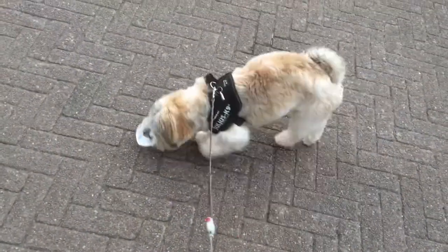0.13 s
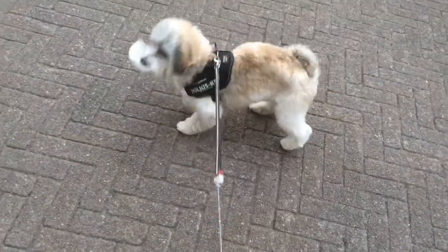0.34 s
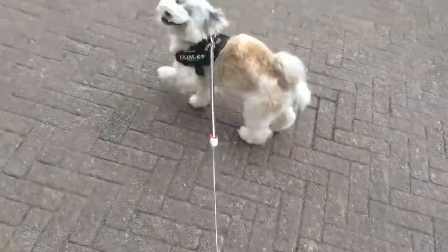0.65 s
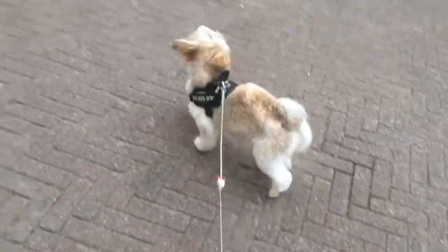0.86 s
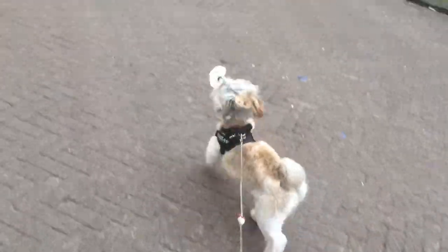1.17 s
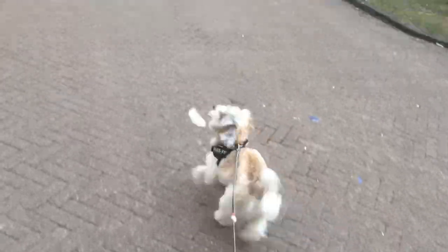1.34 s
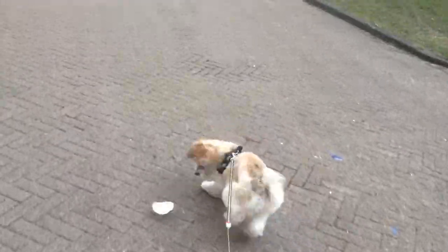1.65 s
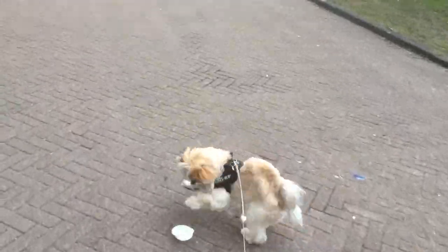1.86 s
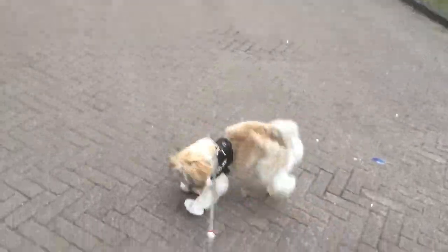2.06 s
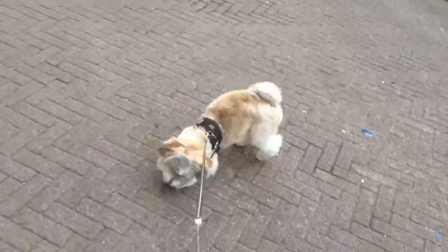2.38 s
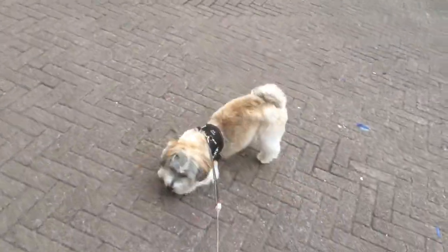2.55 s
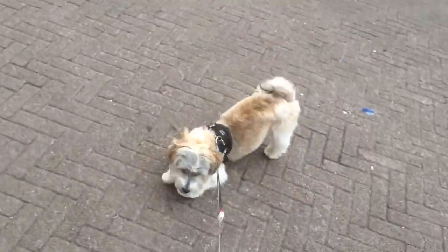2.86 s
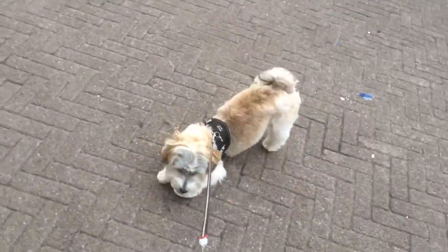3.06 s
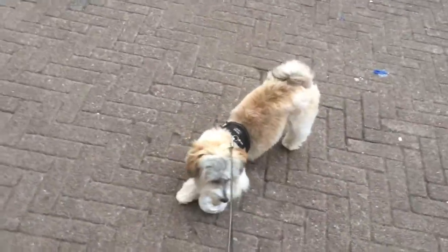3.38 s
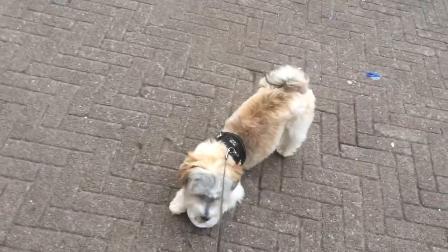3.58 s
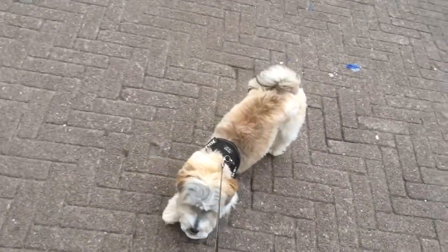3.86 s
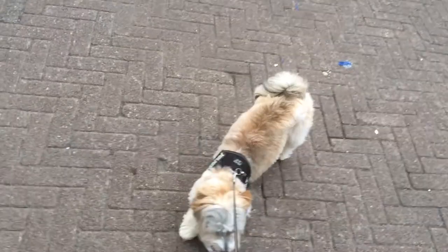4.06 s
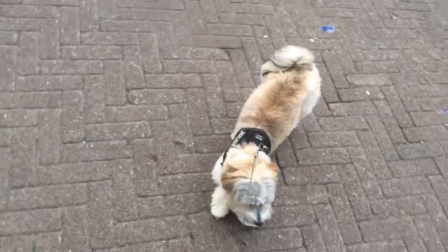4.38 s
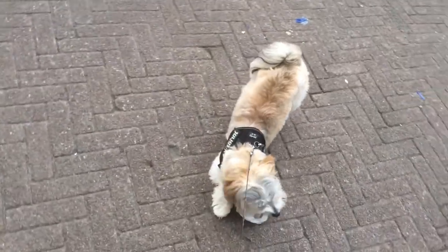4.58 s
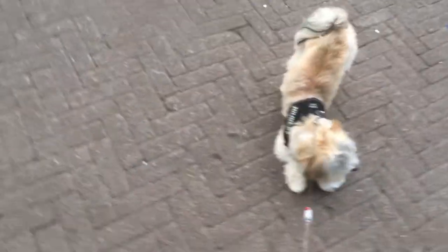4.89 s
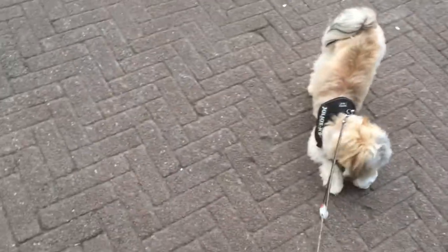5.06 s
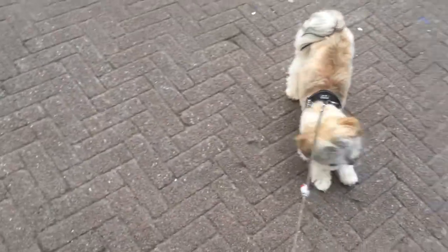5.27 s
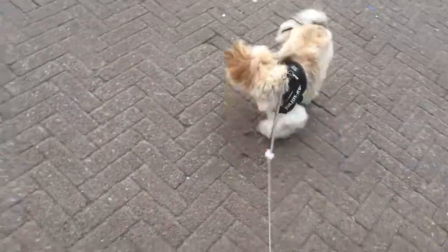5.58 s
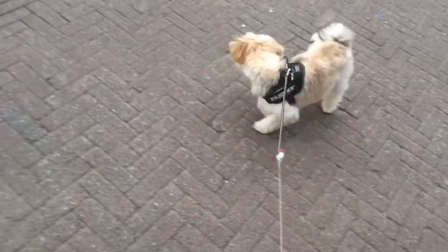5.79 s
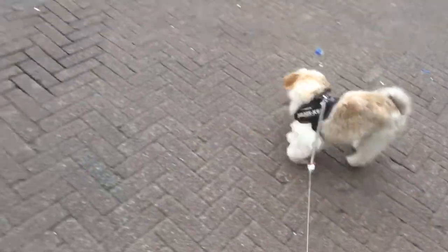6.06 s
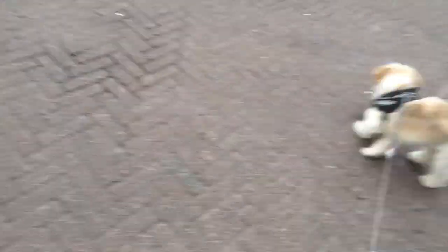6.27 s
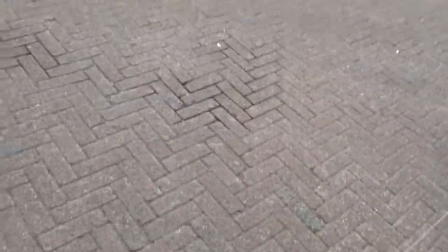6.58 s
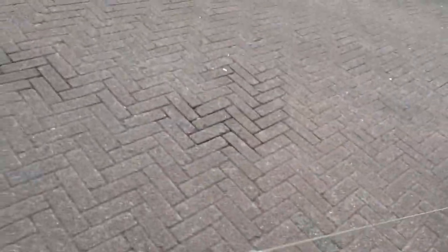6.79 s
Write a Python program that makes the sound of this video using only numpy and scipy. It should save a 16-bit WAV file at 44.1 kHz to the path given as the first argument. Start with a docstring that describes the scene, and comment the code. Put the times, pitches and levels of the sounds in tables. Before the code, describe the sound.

A thin plastic lid clacks and scrapes over brick paving as a small dog paws at it, claws ticking unevenly above faint traffic rumble.

```python
"""A small dog on a reel leash worries a plastic lid on brick paving, close to a hand-held phone.
Throughout, far traffic rumbles in noise bands under two wavering sine hums, and filtered noise hisses in swells.
Claws, lid and leash catch soon click in uneven clusters (noise snaps over plastic modes), with gritty noise scrapes.
A far bird whistles once early on: a breathy gliding sine, up briefly and then down.
Later paws pat (noise puffs over dull damped sines); one low thump, a short tone under an arch, falls near the end."""
import sys
import numpy as np
from scipy import signal
from scipy.io import wavfile
from scipy.ndimage import uniform_filter1d

SR = 44100
rng = np.random.default_rng(int(sys.argv[2]) if len(sys.argv) > 2 else 0)


def transcribe(u):
    """Save the signal u as a 16-bit wav file named by the first command-line argument.

    u: samples, shape (n,) or (channels, n), limited to [-1, 1]; the rate is SR.
    q: integer samples, one column per channel.
    """
    v = np.clip(np.atleast_2d(u).T, -1, 1)
    q = np.round(v * 32767).astype(np.int16)
    wavfile.write(sys.argv[1], SR, q)


N = 305877
TIME = np.arange(N) / SR
HIT_TIME = np.arange(int(.09 * SR)) / SR  # s, span of one contact

# hard clicks: start_s, relative snap_db, snap_centre_hz, ring_peak_db, struck_part_hz
CLICKS = [(.121, -37.5, 7340, -49, 3000), (.1268, -41, 8600, -31, 3060), (0.1371, -29, 7900, -35, 1380),
          (.143, -37, 7600, -32, 2400), (.168, -37, 9000, -37.5, 1300), (0.1765, -33.5, 7900, -29, 2900),
          (0.256, -52, 7150, -39.5, 2510), (0.3358, -43, 7900, -71, 900), (0.43, -46, 8350, -50.5, 1660),
          (.588, -29, 7600, -31.5, 2320), (.6116, -33, 7350, -45, 1200), (0.6202, -24.5, 7500, -23, 3400),
          (0.622, -37, 7500, -31, 1040), (0.635, -38, 7940, -43, 1040), (.6559, -33, 10100, -49, 2080),
          (0.6669, -38, 9000, -59, 890), (.693, -35, 7900, -29.5, 2350), (0.781, -44.5, 8800, -55, 2060),
          (1.0619, -43.5, 9100, -48, 1660), (1.1198, -48, 8600, -63, 1230), (1.211, -32, 8400, -33.5, 1920),
          (1.22, -29, 6270, -30.5, 1900), (1.2324, -30, 6900, -34.5, 1150), (1.2478, -38, 7600, -29, 1970),
          (1.2672, -28, 6660, -27.5, 2240), (1.2782, -33, 7200, -32, 3480), (1.2865, -32, 8300, -27, 2040),
          (1.2937, -36, 9700, -24, 2520), (1.4348, -38.5, 10700, -49, 1200),
          (1.5372, -39.5, 11400, -56, 1170), (1.7207, -12, 6500, -13, 1770), (1.7406, -27, 8200, -17, 2850),
          (1.7415, -16, 7000, -18.5, 2760), (1.791, -41, 11100, -48, 1030),
          (1.8198, -33.5, 7800, -37.5, 4200), (1.8932, -34, 7100, -31.5, 2440),
          (1.9, -34.5, 6500, -34.5, 1570), (1.9302, -39, 7600, -37, 1520), (1.9364, -42, 8800, -36, 2400),
          (1.9631, -45, 6160, -38, 1510), (2.0601, -42, 7000, -33.5, 2390), (2.067, -41, 8000, -34, 2470),
          (2.0864, -46, 7000, -26.5, 2400), (2.0942, -22, 8600, -25, 2470),
          (2.1036, -20.5, 8000, -17.5, 3200), (2.1143, -21.5, 7450, -29, 1800),
          (2.1254, -35, 8000, -40, 1060), (2.2174, -36.5, 5360, -34.5, 2270),
          (2.2734, -18, 9400, -42, 1640), (2.2813, -35, 6500, -26.5, 1930), (2.3164, -31, 7500, -40, 2490),
          (2.327, -24, 7000, -29, 3370), (2.3378, -14, 7050, -20, 1830), (2.3534, -28, 9700, -30, 3640),
          (2.3617, -34, 8800, -34, 1690), (2.3875, -52, 7800, -39, 1340),
          (2.4288, -36.5, 8240, -36.5, 1760), (2.566, -43, 6900, -47, 1490),
          (2.6436, -26.5, 7600, -21.5, 3000), (2.7357, -34, 11400, -48, 1220),
          (2.7523, -15, 11500, -31.5, 3750), (2.759, -24, 8850, -42, 3450), (2.8953, -36, 8000, -45, 3650),
          (2.903, -24, 9900, -26, 3500), (2.926, -40, 7000, -38, 1350), (2.9357, -17, 10700, -30.5, 3550),
          (2.952, -19, 10800, -35, 3500), (3.27, -28.5, 11800, -43, 1080), (3.275, -51, 9100, -37, 890),
          (3.286, -20.5, 11300, -36, 1020), (3.297, -14.5, 9400, -26.5, 1260),
          (3.305, -29, 10100, -34, 3420), (3.312, -37, 8400, -31, 3690), (3.3225, -27, 11000, -27, 1410),
          (3.326, -4.5, 11700, -19.5, 2900), (3.3349, -18, 8100, -15, 2820),
          (3.346, -23.5, 6760, -25.5, 1580), (3.3626, -28, 6650, -34, 1710),
          (3.6828, -42, 7000, -36.5, 2740), (3.6951, -29.5, 7100, -30.5, 1730),
          (3.7001, -40, 8500, -30, 1810), (3.716, -42, 7500, -39, 1810), (3.903, -60, 6950, -35, 1370),
          (4.0535, -45, 7900, -49, 1790), (4.0633, -58, 9000, -41, 975), (4.073, -60, 9000, -47, 1010),
          (4.1158, -50, 7500, -32, 1550), (4.125, -17, 9900, -33.5, 2550), (4.1654, -47, 6500, -48, 1090),
          (4.2, -37, 7700, -37.5, 1510), (4.2135, -18.5, 10000, -31.5, 2300), (4.225, -24, 9700, -35, 4200),
          (4.2354, -27, 9200, -38, 2270), (4.247, -16, 9000, -25.5, 3820), (4.5299, -23, 7500, -30, 2340),
          (4.6165, -44, 8100, -47, 1560), (4.759, -8.5, 10200, -12, 3260), (4.781, -52, 7200, -35.5, 1810),
          (4.898, -42.5, 8700, -60, 1220), (4.97, -32.5, 8500, -40.5, 790), (4.9913, -55, 8100, -45, 1240),
          (5.0494, -20, 7550, -27, 1960), (5.0674, -17, 8700, -21.5, 2700), (5.0825, -34, 7800, -43, 2090),
          (5.1116, -39.5, 9000, -47, 3200), (5.187, -34, 10600, -63, 930), (5.252, -15, 8400, -26, 2550),
          (5.272, -20.5, 9000, -31, 2210), (5.2774, -28, 7440, -29, 3600), (5.29, -39, 8500, -26.5, 2360),
          (5.2953, -24.5, 9400, -37, 790), (5.3027, -30, 8900, -33.5, 806),
          (5.3228, -24.5, 8600, -46, 1570), (5.508, -46, 9800, -45, 1270), (5.5163, -37, 9200, -54, 1180),
          (5.529, -45, 10500, -60, 1500), (5.6203, -39, 9600, -57, 1800), (5.6316, -34, 11400, -52, 1140),
          (5.825, -41, 10200, -60, 1110), (6.4041, -8, 8200, -2.5, 1785), (6.4145, -30, 7200, -39, 1680),
          (6.429, -35, 7800, -51, 1840), (6.435, -49, 7500, -50, 2110)]
SNAP_REF_HZ = 8120


def undb(db):
    """Decibels to amplitude ratio."""
    return 10 ** (np.asarray(db) / 20)


def unit(x):
    """Scale to an RMS of 1."""
    return x / np.sqrt(np.mean(x ** 2))


def band(x, lo_hz, hi_hz, order=2):
    """Butterworth band-pass."""
    sos = signal.butter(order, [lo_hz, min(hi_hz, .45 * SR)], "band", fs=SR, output="sos")
    return signal.sosfilt(sos, x)


def fade(t, t60_s):
    """Exponential decay, 60 dB down at t60_s."""
    return np.exp(-np.log(1000) * t / t60_s)


def add(out, start_s, sound):
    """Mix a sound in at its start time."""
    i = int(start_s * SR)
    out[i:i + len(sound)] += sound[:N - i]


def curves(table):
    """Interpolate each column over time; the first column is time in s."""
    s, *columns = np.transpose(table)
    return [np.interp(TIME, s, c) for c in columns]


def walk(rate_hz):
    """Random levels held 1 / rate_hz s and slewed twice; spread near 1."""
    k = int(SR / rate_hz)
    held = np.repeat(rng.standard_normal(N // k + 1), k)
    return 1.321 * uniform_filter1d(uniform_filter1d(held, k), k)[:N]


def arch(start_s, length_s, edge):
    """Rise and fall over one stretch, silent elsewhere; smaller edge = flatter top, quicker edges."""
    half_sine = np.sin(np.pi * np.clip((TIME - start_s) / length_s, 0, 1)).clip(0)
    return half_sine ** edge * (TIME < start_s + length_s)


def traffic():
    """Half-octave bands of far rumble that flicker alone, and two narrow hums that waver."""
    # level course: time_s, rumble_db, low_hum_db, upper_hum_db
    level_course = [(0, -45, -41.5, -51.5), (1.0, -47.5, -47, -54), (1.4, -45.5, -48, -62.5),
                    (1.8, -47, -57, -49.5), (2.65, -48, -50, -61), (2.95, -51, -70, -52.5),
                    (3.3, -47, -61.5, -54), (4.15, -49, -59, -58.5), (4.6, -56, -72, -60.5),
                    (4.8, -47, -79, -57.5), (5.35, -55, -68, -65), (5.6, -51.5, -58, -66),
                    (6.4, -50, -53, -61), (6.94, -46.5, -49, -53)]
    # hum centres: low_hz, upper_hz
    hum_centres_hz = (45.6, 215.4)
    # rumble spectrum: freq_hz, relative band_gain_db
    spectrum = [(15, -37), (25, -26), (55, 3), (101, 1.5), (223, -4.5), (284, -24), (356, -15.5),
                (517, -19.5), (618, -23.5), (957, -24), (1200, -31), (1560, -50), (2640, -120)]
    rumble_db, *hum_db = curves(level_course)
    mean_db = rumble_db.mean()
    spectrum_hz, spectrum_db = np.transpose(spectrum)
    rumble = 0
    for hz in 30 * 2 ** np.arange(0, 5.3, .5):
        share = np.clip(1.3 - hz / 400, .2, 1)  # the swells are mostly in the bass
        db = np.interp(np.log(hz), np.log(spectrum_hz), spectrum_db)
        db = db + share * (rumble_db - mean_db) + 1.2 * walk(6)
        rumble = rumble + undb(db) * band(rng.standard_normal(N), hz / 2 ** 0.21, hz * 2 ** 0.24)
    out = unit(rumble) * undb(mean_db)
    for hz, db in zip(hum_centres_hz, hum_db):
        phase = 2 * np.pi * np.cumsum(hz * (1 + 0.02023 * walk(5))) / SR
        out = out + undb(db + 1.2 * walk(14)) * np.sin(phase)
    return out


def hiss():
    """Fine rubbing noise with a little grit, calm between swells; bands flicker alone."""
    # swells: start_s, length_s, high_hiss_db, mid_rustle_db
    swells = [(0.317, 0.13, -68, -68), (1.683, 0.2, -77, -58), (1.954, 0.31, -58.5, -58),
              (2.27, 0.25, -60, -56), (2.484, 0.24, -71, -65), (2.95, 0.31, -68, -81),
              (3.122, 0.38, -59.5, -61), (3.54, 0.45, -59, -61.5), (4.178, 0.37, -62.5, -64),
              (4.48, 0.48, -63, -58.5), (4.874, 0.39, -62.5, -61), (5.195, 0.28, -53.5, -57.5),
              (5.469, 0.05, -56, -72), (5.61, 0.071, -54, -67), (5.66, 0.47, -61, -61.5),
              (6.125, 0.48, -67, -60.5), (6.446, .17, -53.5, -55.5), (6.687, .2, -66.5, -64.5)]
    calm_high_db, calm_mid_db = -71.5, -64
    power = undb([[calm_high_db], [calm_mid_db]]) ** 2
    for start_s, length_s, *db in swells:
        power = power + (undb(db)[:, None] * arch(start_s, length_s, 0.63)) ** 2
    high_gain, mid_gain = np.sqrt(power)
    grit = undb(.8 * rng.exponential(size=N // 30 + 1)).repeat(30)[:N]
    noise = rng.standard_normal((3, N)) * unit(grit)
    high = unit(band(noise[0], 3800, 11500)) * undb(0.73 * walk(22))
    air = unit(band(noise[1], 11000, 13700)) * undb(-9 + .8 * walk(20))
    mid = unit(band(noise[2], 810, 2100, order=1)) * undb(0.55 * walk(35))
    return high_gain * (high + air) + mid_gain * mid


def strays():
    """Faint chance ticks, each shortly before or after some hard click; rows as in CLICKS."""
    count, spread_s = 24, 0.023
    mean_db, scatter_db, part_hz = -52.5, 2.5, 1580
    chance = rng.standard_normal((count, 4))
    near_s = np.array(CLICKS)[rng.integers(len(CLICKS), size=count), 0]
    start_s = abs(near_s + spread_s * chance[:, 0])
    snap_db, ring_db = (mean_db + scatter_db * chance[:, 1:3]).T
    stray_part_hz = part_hz * 2 ** np.tanh(chance[:, 3])  # within an octave either way
    return list(zip(start_s, snap_db, np.full(count, SNAP_REF_HZ), ring_db, stray_part_hz))


def clicks():
    """Each contact is a sharp noisy snap plus the plastic modes nearest the struck part."""
    # plastic modes: mode_hz, relative level_db, t60_s
    plastic_modes = [(446, 15.5, 0.022), (508, 10, 0.05), (819, 10.5, 0.031), (1019, -2, 0.046),
                     (1322, -1, 0.026), (1665, 2, 0.03), (1848, -4.5, 0.019), (2170, -3, 0.024),
                     (2737, 5, 0.0065), (3610, 0, 0.0091), (3870, 0.5, 0.0061)]
    ref_t60_s, shortening_power = 0.014, 2.2  # brighter snaps die sooner
    rise_s = 0.00016
    out, t = np.zeros(N), HIT_TIME
    mode_hz, mode_db, mode_t60_s = (c[:, None] for c in np.transpose(plastic_modes))
    for start_s, snap_db, snap_hz, ring_db, part_hz in [*CLICKS, *strays()]:
        grit = rng.standard_normal((2, len(t)))
        chance = rng.standard_normal((2, len(mode_hz), 1))
        t60_s = ref_t60_s * (SNAP_REF_HZ / snap_hz) ** shortening_power
        # a quick crack over a weaker rattle that lasts longer
        shape = fade(t, t60_s) + 1.85 * fade(t, 0.0069) + undb(-20.0) * fade(t, 5.0 * t60_s)
        shape = shape * (1 - np.exp(-t / rise_s))
        burst = grit[0] * shape
        snap = band(burst, .5 * snap_hz, 1.286 * snap_hz) + undb(-13.0) * band(burst, 8200, 13500)
        snap = unit(snap) * np.sqrt(np.mean(shape ** 2)) / 3.36
        # modes far from the struck part are stirred less; each blow detunes them a little
        reach_db = mode_db - 22 * abs(np.log2(mode_hz / part_hz))
        waves = np.sin(2 * np.pi * mode_hz * (1 + 0.027 * chance[0]) * t) * np.sign(chance[1])
        modes = (undb(reach_db) * waves * fade(t, mode_t60_s)).sum(axis=0)
        ring = unit(band(modes, 323, 6200))  # thin plastic gives no bass
        # contact chatter, its decay tied to the snap's
        chatter = unit(band(grit[1] * fade(t, 1.67 * t60_s), 0.783 * part_hz, 1.173 * part_hz))
        ring = ring + 0.72 * chatter
        add(out, start_s, undb(snap_db) * snap + undb(ring_db) * ring / abs(ring).max())
    return out


def scrapes():
    """Stick-slip over the brick grain: dense uneven ticks, swelling and fading within each stroke."""
    # lid and claws over brick: start_s, length_s (3 ms at least), level_db, centre_hz
    strokes = [(0.125, 0.033, -55.5, 3500), (0.168, 0.032, -55, 4500), (0.609, 0.027, -37.5, 4080),
               (0.769, 0.016, -61.5, 8000), (0.845, 0.018, -61.5, 9000), (0.97, 0.016, -64.5, 7850),
               (1.173, 0.0058, -59, 5000), (1.185, 0.0069, -59, 4000), (1.283, 0.021, -42.5, 3000),
               (1.372, 0.027, -60, 5000), (1.681, 0.011, -61, 7000), (2.076, 0.02, -44.5, 3540),
               (2.103, 0.02, -39.5, 3980), (2.263, 0.052, -44, 3480), (2.319, 0.041, -33.5, 4640),
               (2.362, 0.05, -52, 2500), (2.427, 0.011, -49.5, 4500), (2.44, 0.0026, -57, 6000),
               (2.456, 0.013, -53, 5000), (2.513, 0.015, -57.5, 2500), (2.73, 0.013, -54.5, 9000),
               (3.29, 0.0095, -38.5, 9000), (3.32, 0.014, -35, 8000), (3.682, 0.023, -57, 2500),
               (3.893, 0.019, -50.5, 2480), (4.111, 0.021, -45, 3960), (4.752, 0.02, -47, 3500),
               (4.977, 0.022, -52.5, 2500), (5.062, 0.027, -43.5, 3470), (6.426, 0.016, -55, 3000),
               (6.65, 0.035, -57, 5000), (6.706, 0.052, -61.5, 8060)]
    out = np.zeros(N)
    for start_s, length_s, db, hz in strokes:
        count = int(max(length_s, .003) * SR)
        unevenness = undb(3.0 * rng.exponential(size=150)).repeat(20)
        ticks = rng.standard_normal(3000) * unevenness
        stroke = np.pad(ticks[:count] * np.hanning(count) ** .4, (0, 300))  # room for the filter to ring out
        add(out, start_s, undb(db) * unit(band(stroke, 0.1 * hz, 1.42 * hz, order=1)))
    return out


def bird():
    """A thin, breathy whistle: a short rise, then a longer fall, trilling unevenly in level."""
    # notes: start_s, length_s, first_hz, last_hz, level_db
    notes = [(0.538, 0.068, 2010, 2190, -62), (0.717, .22, 2120, 1935, -60)]
    hz, gain = np.zeros(N), np.zeros(N)
    for start_s, length_s, first_hz, last_hz, db in notes:
        shape = arch(start_s, length_s, 0.32)
        hz += (shape > 0) * (first_hz + (last_hz - first_hz) * (TIME - start_s) / length_s)
        gain += undb(db) * shape
    trill_hz = 60 * (1 + .15 * walk(20))
    trill = 1 + .45 * np.sin(2 * np.pi * np.cumsum(trill_hz) / SR)
    breath = 1 + 0.42 * walk(300)
    level = gain * trill * breath * undb(1.1 * walk(39.0))
    return level * np.sin(2 * np.pi * np.cumsum(hz * (1 + 0.0052 * walk(59.2))) / SR)


def pats():
    """Soft contact of paws and dull knocks: a dry, broad puff over a dull ring."""
    # pats: time_s, peak_db, pitch_hz
    soft_contacts = [(1.72, -31.5, 545), (2.414, -30, 464), (2.487, -38, 390), (3.199, -39.5, 378),
                     (3.273, -32.5, 277), (3.896, -38, 500), (3.986, -41.5, 414), (4.062, -33, 425),
                     (4.164, -39, 265), (5.069, -35, 279), (5.291, -27, 290), (5.447, -36.5, 270),
                     (5.503, -34, 412), (6.158, -41.5, 338), (6.34, -44.5, 345), (6.364, -45, 312),
                     (6.402, -20.5, 473), (6.63, -40, 366), (6.644, -34.5, 313), (6.661, -36, 366),
                     (6.705, -36.5, 277), (6.764, -37, 326), (6.849, -42.5, 437)]
    cycles_to_60db, delay_s, rise_s = 13.9, 0.00158, 0.00063
    out, t = np.zeros(N), HIT_TIME
    for time_s, peak_db, hz in soft_contacts:
        t60_s = cycles_to_60db / hz
        puff = band(rng.standard_normal(len(t)) * fade(t, .5 * t60_s), .7 * hz, 3.6 * hz)
        ring = np.sin(2 * np.pi * hz * t) * fade(t, t60_s) * (1 - np.exp(-t / rise_s))
        pat = 0.62 * unit(puff) + unit(ring)
        add(out, time_s + delay_s, undb(peak_db) * pat / abs(pat).max())
    return out


def thump():
    """One low thump: a steady low tone under a squared-sine arch."""
    # thump: start_s, level_db, pitch_hz, length_s
    start_s, level_db, hz, length_s = (5.814, -30, 70, .066)
    out, t = np.zeros(N), HIT_TIME
    shape = np.sin(np.pi * np.clip(t / length_s, 0, 1)) ** 2
    add(out, start_s, -undb(level_db) * np.cos(2 * np.pi * hz * t) * shape)
    return out


def echo(near):
    """Paving and nearby walls scatter a short, dull tail."""
    level_db, t60_s = -25, 0.14
    t = TIME[:int(.3 * SR)]
    scatter = band(rng.standard_normal(len(t)), 410, 5500, order=1) * fade(t, t60_s) * (t > .003)
    scatter = scatter / np.sqrt(np.sum(scatter ** 2))
    return undb(level_db) * signal.fftconvolve(near, scatter)[:N]


def scene():
    """Near contacts with their echo, over hiss, traffic and bird; one channel."""
    near = clicks() + scrapes() + pats() + thump()
    return (near + echo(near) + hiss() + traffic() + bird())[None]


def record(dry):
    """The phone drops the deepest bass, rounds the very loudest peak and cuts the top."""
    ceiling, top_hz = .93, 16300
    dry = signal.sosfilt(signal.butter(2, 30, "high", fs=SR, output="sos"), dry)
    dry = dry / (1 + abs(dry / ceiling) ** 4) ** .25
    return signal.sosfilt(signal.ellip(10, .2, 70, top_hz, fs=SR, output="sos"), dry)


dry = scene()
out = record(dry)
transcribe(out)
```